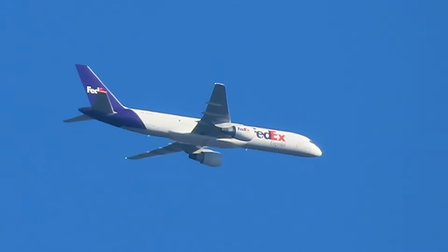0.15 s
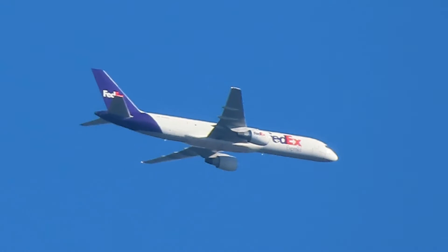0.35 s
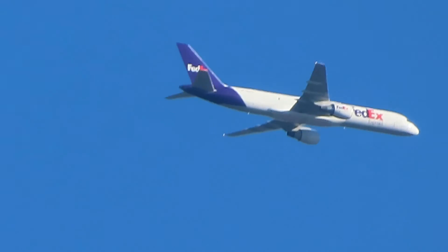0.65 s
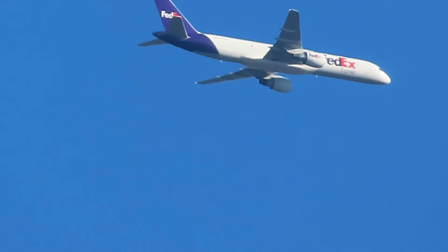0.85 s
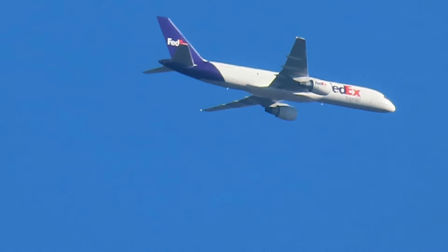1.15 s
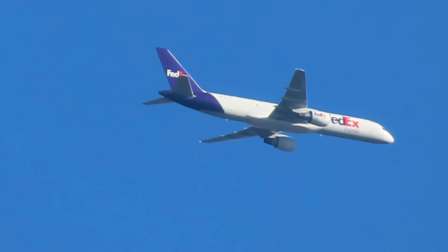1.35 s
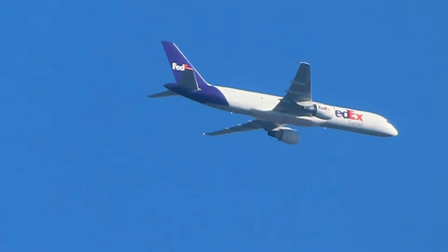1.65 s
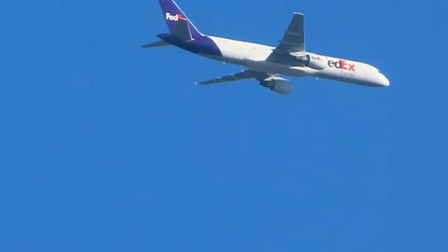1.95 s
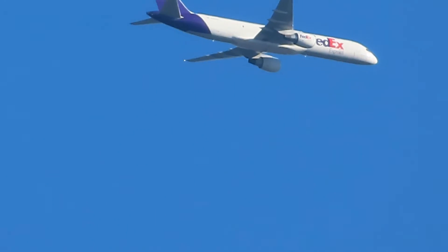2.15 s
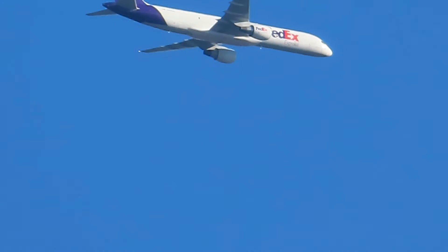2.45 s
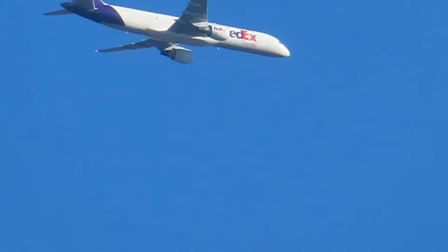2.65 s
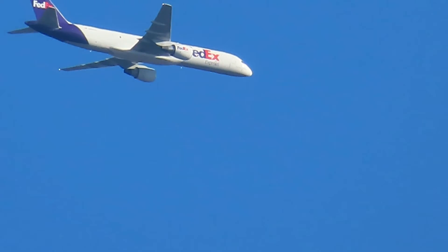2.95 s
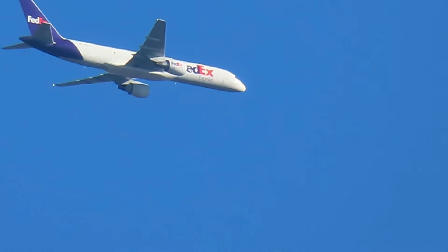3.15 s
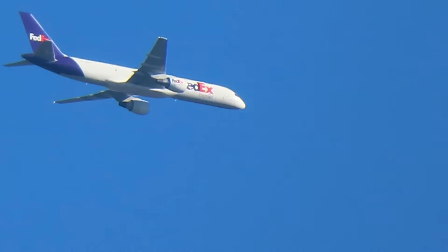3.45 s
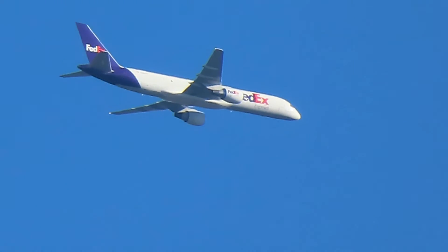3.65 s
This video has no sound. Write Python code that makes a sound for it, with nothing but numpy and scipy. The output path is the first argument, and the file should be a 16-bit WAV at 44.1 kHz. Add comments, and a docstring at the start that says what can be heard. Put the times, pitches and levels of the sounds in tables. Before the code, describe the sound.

A distant jet airliner high overhead rumbles continuously for about four seconds, deep and mostly central, with uneven low surges and a muffled roar that wavers and crackles faintly. Close soft ticks from the hand-held camera fall near 0.8, 1.9, 2.0, 2.3, 3.1, 3.5 and 3.8 seconds. Duller grip knocks come near 1.3 and 1.6, then cluster from 2.25 to 2.7. Even hiss throughout, open air.

```python
"""Outdoors, under a jet airliner crossing high overhead, heard through a hand-held camera.
The exhaust is coloured noise that rumbles in lumpy surges and crackles faintly.
Moving air makes the humps of the roar swell and fade and the upper roar flutter.
The camera body adds soft ticks and knocks: noise bursts and ringing modes, over an even hiss."""
import sys
import numpy as np
from scipy import signal
from scipy.fft import rfft, irfft
from scipy.io import wavfile
from scipy.ndimage import uniform_filter1d

SR = 44100
rng = np.random.default_rng(int(sys.argv[2]) if len(sys.argv) > 2 else 0)


def bounce(signal):
    """Save signal as a 16-bit WAV file at the path given by the first command-line argument."""
    frames = np.transpose(np.atleast_2d(signal))
    limited = np.clip(frames, -1, 1)
    pcm = np.round(limited * 32767).astype(np.int16)
    wavfile.write(sys.argv[1], SR, pcm)


N = 167580  # samples, 3.8 s


def undb(db):
    """Turn decibels into an amplitude gain."""
    return 10 ** (np.asarray(db) / 20)


def pan(balance_db):
    """Left and right gains, balance_db apart: positive leans left."""
    return undb(balance_db * np.array([[0.5], [-0.5]]))


def noise(spectrum, side_db):
    """Coloured stereo noise: the middle has rms 1, the side is at side_db relative to it."""
    hz, db = np.array(spectrum, float).T
    log_hz = np.log(np.maximum(np.arange(N // 2 + 1) * SR / N, 1))
    points = np.log(hz)
    # outside the table the colour falls 20 dB per factor e in frequency
    beyond = np.maximum(points[0] - log_hz, 0) + np.maximum(log_hz - points[-1], 0)
    gain = undb(np.interp(log_hz, points, db) - 20 * beyond)
    pair = irfft(rfft(rng.standard_normal((2, N))) * gain, N)
    mid, side = pair / pair.std(axis=1, keepdims=True)
    return mid + undb(side_db) * side * np.array([[1], [-1]])


def walk(rate_hz):
    """Random levels drawn rate_hz times a second and smoothed twice; standard deviation 1."""
    hold = max(int(SR / rate_hz), 2)
    held = rng.standard_normal(N)[np.arange(N) // hold]
    slewed = uniform_filter1d(uniform_filter1d(held, hold), hold)
    return slewed / slewed.std()


def swell(curve, depth):
    """Gain of rms 1 that follows a level curve about its mean, its dB swings scaled by depth."""
    s, db = np.array(curve, float).T
    line = np.interp(np.arange(N) / SR, s, db)
    gain = undb(depth * (line - line.mean()))
    return gain / np.sqrt(np.mean(gain ** 2))


def steady(x, span_s):
    """Even out the drift of a noise that is slower than about span_s."""
    power = uniform_filter1d(np.mean(x ** 2, axis=0), max(int(span_s * SR), 64))
    return x * np.sqrt(power.mean() / (power + 1e-12))


def burst(start_s, decay_s):
    """Envelope of a soft contact: a quick rise and an exponential fall, peak 1."""
    age = np.maximum(np.arange(N) / SR - start_s, 0) / decay_s
    return np.sqrt(2 * np.e * age) * np.exp(-age)


# colours of the deep exhaust rumble and the boom just above it: pitch_hz, relative level_db [dB per Hz]
RUMBLE_COLOUR = [(12, -35), (20, -6), (32, -11.5), (42, -9), (52, -4), (60, 8), (68, -5), (80, -12.5),
                 (120, -23.5)]
BOOM_COLOUR = [(55, -44), (70, -4.5), (82, -4.5), (92, 2), (104, -4), (120, -8), (165, -9.5), (200, -13.5),
               (330, -20), (600, -52)]
# their slow surging, only the swing about the mean counts: time_s, level_db (before the depth)
RUMBLE_SURGING = [(0.0, -44), (0.45, -31), (0.8, -33), (0.95, -33), (1.22, -29.5), (1.4, -30), (1.5, -29),
                  (2.08, -31), (2.55, -31.5), (2.8, -29.5), (3.22, -27.5), (3.4, -29.5), (3.77, -30.5)]
BOOM_SURGING = [(0.0, -37.5), (0.6, -33), (0.94, -35), (1.42, -36.5), (1.53, -33), (1.62, -32.5),
                (1.98, -38), (2.06, -38), (2.22, -35), (2.7, -31), (2.9, -32.5), (3.35, -32.5), (3.6, -34),
                (3.77, -39)]
RUMBLE_DB, RUMBLE_SIDE_DB = -36, -48
BOOM_DB, BOOM_SIDE_DB = -36, -35


def jet_rumble():
    """The largest eddies of the exhaust: low noise, nearly alike in both ears, surging slowly."""
    deep = steady(noise(RUMBLE_COLOUR, RUMBLE_SIDE_DB), span_s=0.108)
    deep = undb(RUMBLE_DB) * deep * swell(RUMBLE_SURGING, depth=0.69)
    boom = steady(noise(BOOM_COLOUR, BOOM_SIDE_DB), span_s=0.091)
    boom = undb(BOOM_DB) * boom * swell(BOOM_SURGING, depth=0.88)
    return deep + boom


# single surges of the exhaust: centre_s, pitch_hz (before wander), peak level_db,
# half_length_s (standard deviation of the bell-shaped envelope)
SURGE_LUMPS = [(0.13, 85.5, -30.5, 0.077), (0.264, 82.8, -25, 0.024), (0.625, 236.7, -36, .014),
               (0.74, 58, -27, .025), (0.857, 66, -23.5, 0.014), (1.061, 227.7, -29, 0.028),
               (1.123, 55, -24.5, 0.029), (1.43, 240.6, -25.5, 0.02), (1.541, 239.7, -28, 0.0098),
               (1.662, 58.1, -31, 0.02), (1.75, 72, -30, 0.028), (1.84, 57.9, -30, .025),
               (2.32, 53.8, -29, 0.056), (2.348, 460, -31, 0.019), (2.377, 90.2, -31.5, 0.026),
               (2.684, 57.7, -24, 0.038), (2.976, 62, -25, 0.02), (3.137, 58, -35, 0.019),
               (3.425, 86, -22.5, 0.012)]
SURGE_WANDER, SURGE_WANDER_HZ = 0.0812, 50.13  # rms share of the pitch; changes per s


def surges():
    """Short wavering tones under bell envelopes stand out of the rumble, alike in both ears."""
    t = np.arange(N) / SR
    # one shared clock that runs unevenly bends every pitch
    wavering_s = np.cumsum(1 + SURGE_WANDER * walk(SURGE_WANDER_HZ)) / SR
    start_turns = rng.random(len(SURGE_LUMPS))
    total = np.zeros(N)
    for (centre_s, hz, db, half_s), turn in zip(SURGE_LUMPS, start_turns):
        envelope = np.exp(-0.5 * ((t - centre_s) / half_s) ** 2)
        total += undb(db) * envelope * np.sin(2 * np.pi * (hz * wavering_s + turn))
    return total


# colours of the lower and upper hump of the roar: pitch_hz, relative level_db [dB per Hz]
LOW_HUMP_COLOUR = [(130, -11), (200, -11.5), (226, 2), (240, -5.5), (260, -1), (295, -9.5), (350, -17.5),
                   (480, -32.5)]
HIGH_HUMP_COLOUR = [(280, -36), (340, -13), (400, -8.5), (445, -2.5), (472, 1), (505, -9.5), (560, -24.5),
                    (700, -54)]
# how each hump swells, only the swing about the mean counts: time_s, level_db (before the depth)
LOW_HUMP_SWELL = [(0.0, -38), (0.44, -34), (0.56, -38), (1.0, -33), (1.18, -35.5), (1.4, -37), (1.7, -34.5),
                  (1.88, -38), (2.04, -32), (2.14, -37.5), (2.36, -36), (2.52, -39.5), (2.96, -32),
                  (3.06, -36.5), (3.22, -33.5), (3.34, -34.5), (3.62, -34), (3.77, -34)]
HIGH_HUMP_SWELL = [(0.0, -49), (0.38, -41), (0.58, -49.5), (0.74, -40.5), (1.26, -43.5), (1.38, -40.5),
                   (1.82, -43.5), (2.3, -34.5), (2.62, -37), (2.98, -42.5), (3.3, -34.5), (3.42, -43),
                   (3.58, -36), (3.77, -49)]
# bands of the upper roar, dulled by the air: centre_hz, reach_hz (centre to skirt),
# level_db (before the trim), side_db (relative to the middle), balance_db (left minus right)
UPPER_BANDS = [(348, 163, -48.5, -3.5, 1), (570, 158, -51, -7, 1), (748, 162, -50.5, -6.5, -2),
               (917, 182, -50.5, -3.5, -1), (1117, 157, -56.5, -1.5, 0.5), (1343, 217, -57.5, -8, 2),
               (1610, 1060, -59.5, 0.5, 1.5)]
LOW_HUMP_DB, LOW_HUMP_SIDE_DB = -37.5, -15
HIGH_HUMP_DB, HIGH_HUMP_SIDE_DB = -43, -7
UPPER_TRIM_DB = -0.48
SKIRT_DB = -14  # band level one reach from its centre
FLUTTER_DB, HUMP_FLUTTER_DB, FLUTTER_HZ = 3, 1.2, 45.19  # rms of bands and upper hump; changes per s


def jet_roar():
    """Moving air swells two noise humps separately and makes each band above flutter."""
    low = steady(noise(LOW_HUMP_COLOUR, LOW_HUMP_SIDE_DB), span_s=0.13)
    low = undb(LOW_HUMP_DB) * low * swell(LOW_HUMP_SWELL, depth=1.5)
    high = steady(noise(HIGH_HUMP_COLOUR, HIGH_HUMP_SIDE_DB), span_s=0.23)
    high = undb(HIGH_HUMP_DB) * high * swell(HIGH_HUMP_SWELL, depth=0.63)
    high = high * undb(HUMP_FLUTTER_DB * walk(FLUTTER_HZ))
    upper = 0
    for hz, reach, db, side_db, balance_db in UPPER_BANDS:
        colour = [(hz - reach, SKIRT_DB), (hz - reach / 3, 0), (hz + reach / 3, 0),
                  (hz + reach, SKIRT_DB), (2 * (hz + reach), 2 * SKIRT_DB)]
        flutter = undb(FLUTTER_DB * walk(FLUTTER_HZ))
        band = steady(flutter * noise(colour, side_db), span_s=0.18)
        upper = upper + undb(db) * pan(balance_db) * band
    return low + high + undb(UPPER_TRIM_DB) * upper


# colour of the exhaust crackle: pitch_hz, relative level_db [dB per Hz]
CRACKLE_COLOUR = [(400, -6), (900, 1.5), (1400, -1.5), (2200, -10.5), (4000, -24)]
CRACKLE_DB, CRACKLE_SIDE_DB = -56.5, -6
CRACKLE_SPREAD_DB, CRACKLE_HZ = 5, 70  # spread of the random level before its cap; changes per s


def crackle():
    """Noise with a fast random level, like small puffs, roughens the upper roar."""
    puffs_db = CRACKLE_SPREAD_DB * np.minimum(walk(CRACKLE_HZ), 2)  # cap the strongest
    return undb(CRACKLE_DB + puffs_db) * noise(CRACKLE_COLOUR, CRACKLE_SIDE_DB)


# modes of the camera body: pitch_hz, level_db (before dulling and ring level), t60_s (fall by 60 dB)
CAMERA_MODES = [(462, -0.5, 0.033), (760, -5, .016), (960, -4.5, 0.027), (1330, -3.5, 0.054),
                (1870, -11, 0.013), (3050, -17, 0.017)]
RING_RISE_S = 0.0007


def ring(start_s, dull_hz):
    """Decaying sines: the camera body's modes after one contact, weaker above dull_hz."""
    first = int(start_s * SR)
    age = np.arange(min(SR // 5, N - first)) / SR
    rise = 1 - np.exp(-age / RING_RISE_S)
    out = np.zeros(N)
    for hz, db, t60 in CAMERA_MODES:
        gain = undb(db) / np.hypot(1, (hz / dull_hz) ** 2)
        decay = np.exp(-np.log(1000) * age / t60)
        out[first:first + len(age)] += gain * np.sin(2 * np.pi * hz * age) * decay * rise
    return out


CONTACT_SIDE_DB = -9  # stereo side of the tick and knock noise, relative to the middle
# ticks of the camera body: start_s, level_db (before crack and ring levels),
# balance_db (left minus right), rebound_s (delay of the second contact)
TICK_EVENTS = [(0.7696, -34.5, -2, 0.0027), (0.848, -42.5, -3, 0.0033), (1.903, -34.5, -6, 0.005),
               (2.022, -39.5, -4, 0.0037), (2.29, -34, -4, 0.0055), (2.446, -41.5, -9, 0.0053),
               (3.095, -35.5, -2, 0.0023), (3.525, -35.5, -3, 0.0029), (3.7935, -36.5, -1, 0.0024)]
# colour of a tick's dry crack: pitch_hz, relative level_db [dB per Hz]
TICK_COLOUR = [(200, -4), (330, 13), (460, 13.5), (620, 4.5), (950, 6.5), (1150, -5), (1400, 2),
               (1850, 4.5), (2300, -3), (3300, -9), (5000, -19.5), (8000, -34), (12000, -52)]
TICK_DECAY_S, REBOUND_DB = 0.0029, -4.5
CRACK_DB, TICK_RING_DB = -1.5, 5


def camera_ticks():
    """Each tick is a noise crack with a quick rebound, and rings the body's modes."""
    crack = undb(CRACK_DB) * steady(noise(TICK_COLOUR, CONTACT_SIDE_DB), span_s=0.0016)
    total = 0
    for start_s, db, balance_db, rebound_s in TICK_EVENTS:
        rebound = undb(REBOUND_DB) * burst(start_s + rebound_s, TICK_DECAY_S)
        contact = crack * (burst(start_s, TICK_DECAY_S) + rebound)
        ringing = undb(TICK_RING_DB) * ring(start_s, dull_hz=4000)
        total = total + undb(db) * pan(balance_db) * (contact + ringing)
    return total


# duller knocks of the grip: start_s, level_db (before the ring level), decay_s (fall to 1/e)
KNOCK_EVENTS = [(1.284, -45, .002), (1.58, -37, 0.0018), (2.254, -31, .004), (2.35, -40, 0.0036),
                (2.4512, -29, 0.002), (2.457, -28, 0.0016), (2.474, -36, 0.0034), (2.5534, -30.5, 0.0025),
                (2.655, -30.5, 0.0032), (2.72, -36, 0.0038)]
# colour of a knock's thud: pitch_hz, relative level_db [dB per Hz]
KNOCK_COLOUR = [(200, 3), (470, 14), (620, -6), (920, 2.5), (1150, 0.5), (1400, -34), (2200, -20),
                (5000, -38)]
KNOCK_RING_DB, KNOCK_DULL_HZ = -4.5, 1090  # a soft contact rings the modes above this less


def grip_knocks():
    """Each knock is a dull noise thud, and rings mainly the body's lower modes."""
    thud = steady(noise(KNOCK_COLOUR, CONTACT_SIDE_DB), span_s=0.003)
    total = 0
    for start_s, db, decay_s in KNOCK_EVENTS:
        ringing = undb(KNOCK_RING_DB) * ring(start_s, KNOCK_DULL_HZ)
        total = total + undb(db) * (thud * burst(start_s, decay_s) + ringing)
    return total


# colour of the even hiss: pitch_hz, relative level_db [dB per Hz]
HISS_COLOUR = [(500, 7), (1500, 2.5), (2500, -0.5), (4000, -4), (6300, -10), (8000, -13.5), (10000, -18.5),
               (12000, -22.5), (14000, -25.5), (15500, -33)]
HISS_DB, HISS_SIDE_DB = -51, -4


def hiss():
    """Wide noise at a constant level, thinning towards the top."""
    return undb(HISS_DB) * noise(HISS_COLOUR, HISS_SIDE_DB)


def scene():
    """Jet rumble, surges, roar and crackle, then camera handling and hiss."""
    jet = jet_rumble() + surges() + jet_roar() + crackle()
    handling = camera_ticks() + grip_knocks()
    return jet + handling + hiss()


def record(dry):
    """The camera cuts the top with a steep elliptic low-pass."""
    top_cut = signal.ellip(8, 0.2, 70, 15300, fs=SR, output="sos")  # order, ripple dB, stop dB, Hz
    return signal.sosfilt(top_cut, dry)


dry = scene()
out = record(dry)
bounce(out)
```